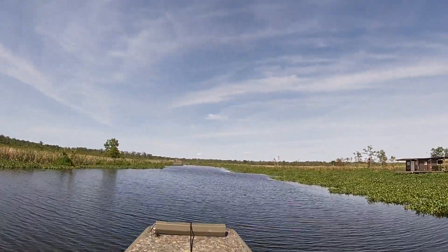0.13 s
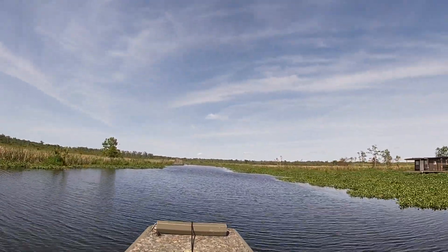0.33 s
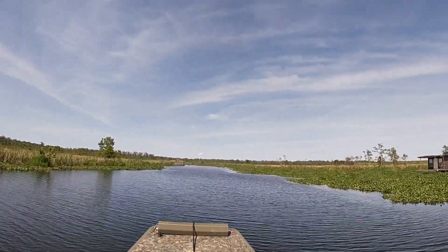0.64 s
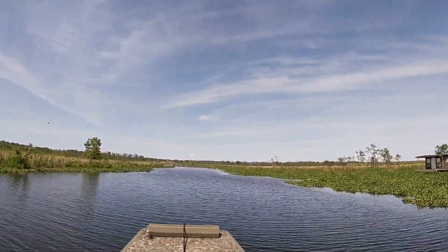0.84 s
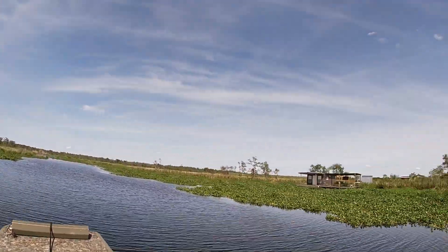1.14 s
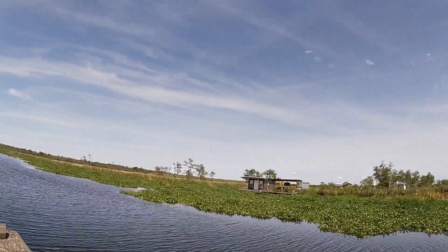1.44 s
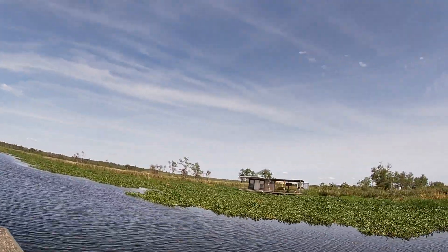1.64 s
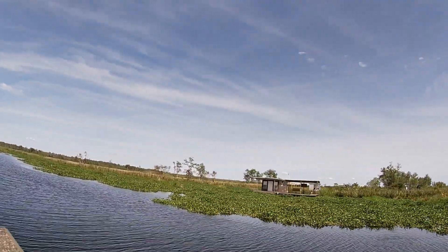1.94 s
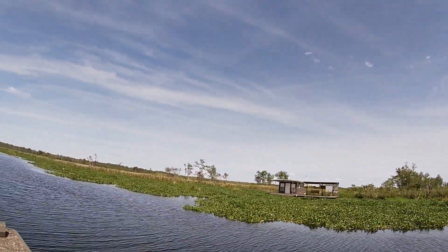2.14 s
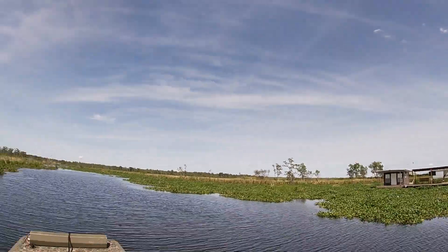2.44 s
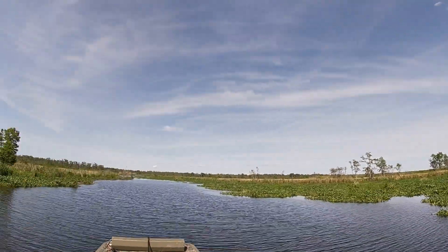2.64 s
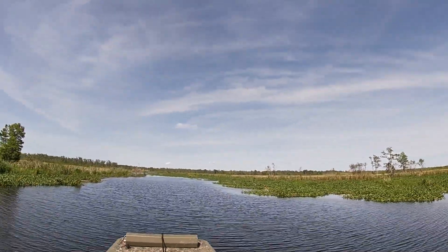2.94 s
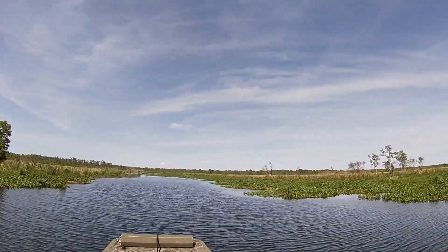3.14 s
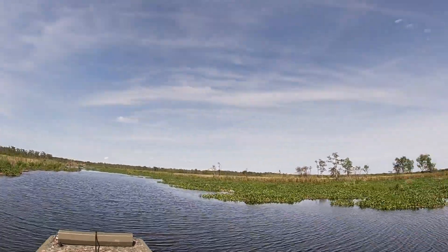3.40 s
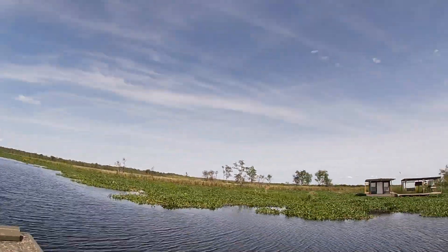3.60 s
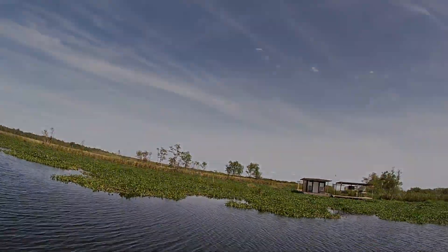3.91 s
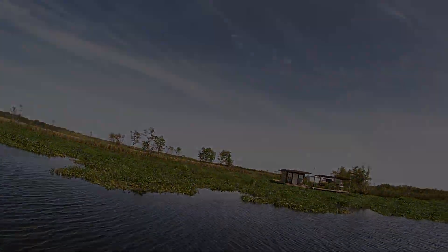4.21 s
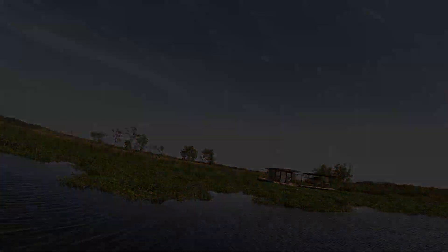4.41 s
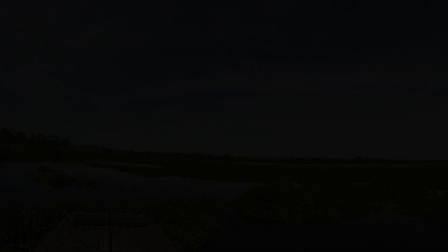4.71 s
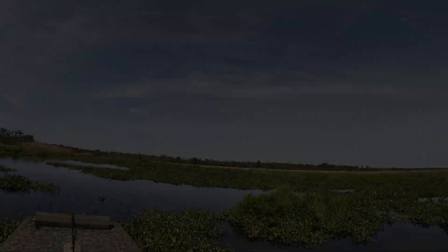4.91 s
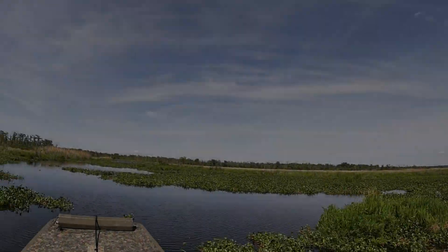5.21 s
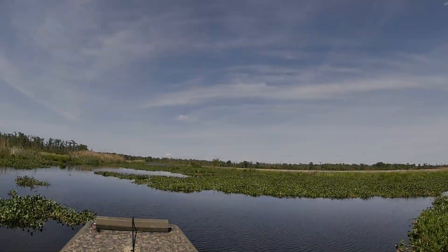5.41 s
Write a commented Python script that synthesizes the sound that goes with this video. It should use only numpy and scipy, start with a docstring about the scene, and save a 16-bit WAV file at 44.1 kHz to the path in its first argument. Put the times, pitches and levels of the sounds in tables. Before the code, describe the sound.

From the start, a loud, low engine drone fills the sound, a nearly pure, steady hum around 150 hertz with a growling exhaust rasp, hull rumble and a much quieter chopped hiss of propeller air. The microphone is on board the airboat in the open, with its level held even and no echo. A brief wind gust passes near 0.5 seconds and another at 1.3. From about 1.4 to 2.5 seconds the microphone faces aside: the rasp softens and airy wind rises. A small gust and swish come at 2.6, as the rasp partly returns, and another swish at 3.5. From 4 seconds the tone dulls again and wind hiss strengthens, gusting until about 4.67, when the sound breaks off and instantly swells back. The engine now turns faster, about two semitones higher, slightly uneven, with stronger beating boom and rumble, faint ticks and a last gust near 5.35.

```python
"""An airboat cruises over a swamp, heard on board through a microphone with fast gain control.
The eight-cylinder engine drones at its firing rate, with exhaust rasp, hull rumble, propeller rush and faint ticks.
Headwind blows in gusts. Twice, around 2 s and past 4 s, the microphone swings well aside: less rasp, more wind.
Near the end the sound breaks off and at once swells back with the engine turning faster.
The tones are cosines tied to the engine's turning or wandering freely; the airy sounds are shaped noise."""
import sys
import numpy as np
from scipy import signal
from scipy.fft import rfft, irfft
from scipy.io import wavfile
from scipy.ndimage import uniform_filter1d

SR = 44100
rng = np.random.default_rng(int(sys.argv[2]) if len(sys.argv) > 2 else 0)


def unload_audio(sound):
    """Save the sound as a 16-bit wav file, at the path given as the first command line argument."""
    columns = np.transpose(np.atleast_2d(sound))
    # keep every value between -1 and 1, then stretch to whole-number steps
    steps = np.round(np.clip(columns, -1, 1) * 32767)
    wavfile.write(sys.argv[1], SR, steps.astype(np.int16))


N = 244755

T = np.arange(N) / SR  # time in seconds
JUMP_S = 4.6754  # moment of the abrupt cut to the faster engine
FAST = T >= JUMP_S
FIRINGS_PER_CYCLE = 8  # each of the eight cylinders fires once a cycle
# How the microphone swings away from the bow and back.
# Each row: time in seconds, turn (0 facing ahead, 1 side-on).
MIC_TURN = [(0, 0.46), (.33, 0), (.75, 0.11), (1.27, .02), (1.42, 0.44), (2.15, 0.66), (2.85, 0.26),
            (3.6, .32), (4.0, 0.7), (4.67, 0.85), (4.68, 0), (4.85, 0.095), (5.05, 0.33), (5.54, 0.056)]


def gain_of(db):
    """Turns decibels into an amplitude factor."""
    return 10 ** (np.asarray(db) / 20)


def evened(x):
    """Scales a signal to an average strength (rms) of 1."""
    return x / np.sqrt(np.mean(abs(x) ** 2) + 1e-20)


def curve(rows):
    """Joins rows of (seconds, value) by straight lines."""
    return np.interp(T, *np.transpose(rows))


def swell(s, length):
    """A smooth rise and fall centred on time s."""
    return np.exp(-(2 * (T - s) / length) ** 2)


def colour(x, points):
    """Filters x along a curve of (Hz, dB), then scales it to rms 1."""
    point_hz, point_db = np.transpose(points)
    hz = np.fft.rfftfreq(N, 1 / SR)
    filter_db = np.interp(np.log(hz + 1), np.log(point_hz), point_db)
    return evened(irfft(rfft(x) * gain_of(filter_db), N))


def band(hz, width):
    """Noise gathered around one frequency, at rms 1; at 0 Hz it is a slow random drift."""
    offset = 2 * (np.fft.rfftfreq(N, 1 / SR) - hz) / width
    return evened(irfft(rfft(rng.standard_normal(N)) / (1 + offset ** 2 / 2), N))


def engine_speed():
    """Firings a second: a steady cruise with a slight drift, then a higher, uneven speed."""
    # Engine speed after the cut. Each row: time in seconds, firings a second in Hz.
    faster = [(4.68, 170), (4.76, 166.7), (4.96, 174.6), (5.05, 171.2), (5.39, 170), (5.54, 171.8)]
    cruise_hz, drift_hz, drift_width_hz = 151.6, .5, 5
    return np.where(FAST, curve(faster), cruise_hz + drift_hz * band(0, drift_width_hz))


def drone(cycles, orders, waver=.09, swing_db=1.5):
    """The firing tone is steady; tones from unequal cylinders waver in phase (turns) and strength."""
    out = np.zeros(N)
    for order, db in orders:
        order = round(order)
        loose = order != FIRINGS_PER_CYCLE  # only the firing tone itself holds steady
        turns = order * cycles + loose * (rng.random() + waver * band(0, 6))
        strength = gain_of(loose * swing_db * band(0, 3))
        out += gain_of(db) * evened(strength * np.cos(2 * np.pi * turns))
    return out


def engine(cycles):
    """The repeating cylinder firings sound as tones at multiples of the cycle rate, one set per speed."""
    # Engine tones before and after the cut. Each row: multiple of the cycle rate, level in dB.
    cruise_orders = [(8, -10), (9, -29.5), (10, -21), (12, -33.5), (17, -39.5)]
    fast_orders = [(8, -11), (11, -32), (15, -46), (19, -39)]
    return np.where(FAST, drone(cycles, fast_orders), drone(cycles, cruise_orders))


def rasp_level():
    """The exhaust rasp (dB) fades as the microphone turns aside and shades it."""
    cruise_db, fast_db, turn_db = -24, -25.5, -12  # facing ahead at each speed; change when side-on
    shade = np.maximum(curve(MIC_TURN), 0) ** 0.68  # under 1: the first part of a turn shades the most
    return np.where(FAST, fast_db, cruise_db) + turn_db * shade


def exhaust(cycles, throb=0.071, puff=0.077):
    """Gas puffs out at each firing, stronger once a cycle: a growling rasp and a steadier roar above it."""
    # Growling tones. Each row: multiple of the cycle rate, level in dB against the rasp level.
    growl_orders = [(13, -12), (14, -16.5), (16, -7), (20, -20), (21, -17.5), (22, -12.5), (24, -21),
                    (29, -21), (31, -24)]
    # Tone colour of the rasp and the roar. Each row: frequency in Hz, relative level in dB.
    rasp_colour = [(120, -26.5), (230, -5), (300, 5), (420, -3.5), (490, -3.5), (560, -3.5), (680, -14.5),
                   (850, -17), (1500, -33), (4000, -65.5)]
    roar_colour = [(300, -13), (550, 3), (700, 2), (850, 0), (1050, -0.5), (1250, -10), (1700, -15.5),
                   (3000, -22), (8000, -61)]
    once_a_cycle = 1 + throb * np.cos(2 * np.pi * cycles)
    each_firing = 1 + puff * np.cos(2 * np.pi * FIRINGS_PER_CYCLE * cycles)
    gate = once_a_cycle * each_firing
    growl = drone(cycles, growl_orders)
    rasp_noise = gain_of(-2.5) * colour(gate * rng.standard_normal(N), rasp_colour)
    rasp = gain_of(rasp_level()) * (growl + rasp_noise)
    roar_gain = gain_of(-39.5 + 1.4 * band(10.0, 6))  # flutters about ten times a second
    roar = roar_gain * colour(gate * rng.standard_normal(N), roar_colour)
    return rasp + roar


def wandering(hz, wander_hz, swing_db=2.5):
    """A tone whose pitch and strength stray at random."""
    turns = np.cumsum(hz + wander_hz * band(0, 16)) / SR
    return evened(gain_of(swing_db * band(0, 12.0)) * np.cos(2 * np.pi * turns))


def hull():
    """Propeller and hull boom in wandering tones that beat against the drone, over a wide rumble."""
    # Booming tones before and after the cut.
    # Each row: frequency in Hz, pitch wander in Hz, level in dB.
    cruise_boom = [(82.5, 9, -33.5), (129.8, 2.6, -35.5), (230.2, 5, -32.5)]
    fast_boom = [(70.8, 6.6, -30), (138.3, 5.6, -16), (205.6, 6.6, -29)]
    # Tone colour of the rumble. Each row: frequency in Hz, relative level in dB.
    rumble_colour = [(10, -21.5), (30, -8), (55, -12), (75, 0), (110, 1), (150, 5.5), (195, 0), (230, -1),
                     (270, -11.5), (400, -20), (900, -68.5)]
    cruise = sum(gain_of(db) * wandering(hz, wander) for hz, wander, db in cruise_boom)
    fast = sum(gain_of(db) * wandering(hz, wander) for hz, wander, db in fast_boom)
    rumble = colour(rng.standard_normal(N), rumble_colour)
    return np.where(FAST, fast + gain_of(-20.5) * rumble, cruise + gain_of(-25.0) * rumble)


def propeller(cycles, flutter_db=1.96, chop=0.17):
    """Air rushes through the blades, chopped at the shaft and blade rates."""
    # Tone colour of the rush. Each row: frequency in Hz, relative level in dB.
    rush_colour = [(400, -10), (1000, 4.5), (1400, -1), (1850, -5), (2400, -1.5), (2850, -0.5),
                   (3400, -2.5), (4300, -11), (5600, -11), (7000, -23.5), (8700, -31), (9900, -23.5),
                   (10800, -50.5), (16000, -75.5)]
    shaft_chop = chop * np.cos(2 * np.pi * 2 * cycles)  # two shaft turns a cycle
    blade_chop = chop * np.cos(2 * np.pi * 6 * cycles)  # six blade passes a cycle
    rush = colour((1 + shaft_chop + blade_chop) * rng.standard_normal(N), rush_colour)
    return gain_of(-49.5 + flutter_db * band(12, 8)) * rush


def wind_level():
    """The wind (dB, before flutter) grows as the microphone turns aside, and with each gust."""
    # Gusts of headwind. Each row: middle in seconds, length in seconds, rise in dB.
    gust_rows = [(.46, .06, 8.5), (1.327, 0.078, 4.5), (2.636, 0.071, 4.5), (4.384, .13, 5),
                 (4.618, 0.23, 4.5), (5.35, 0.2, 7)]
    cruise_db, fast_db, turn_db = -52.5, -58.5, 12  # facing ahead at each speed; change when side-on
    gusts = sum(db * swell(s, length) for s, length, db in gust_rows)
    return np.where(FAST, fast_db, cruise_db) + turn_db * curve(MIC_TURN) + gusts


def wind(flutter_db=0.74, grit_db=1.5):
    """Headwind hisses past the microphone in fluttering gusts; the strongest add a brighter sizzle."""
    # Tone colour of the hiss and the sizzle. Each row: frequency in Hz, relative level in dB.
    hiss_colour = [(500, -17), (1050, 1.5), (1500, 2.5), (2000, 0), (2400, 0), (2900, 1), (3400, -2.5),
                   (4400, -13), (5500, -21.5), (7000, -29), (9000, -40), (16000, -68.5)]
    sizzle_colour = [(1500, -26), (3000, -1.5), (4000, 2), (4700, 1.5), (5500, -10), (7000, -19.5),
                     (10000, -45), (16000, -70.5)]
    gust = gain_of(wind_level() + flutter_db * band(8.8, 4.4) + grit_db * band(0, 65))
    hiss = gain_of(1.5) * gust * colour(rng.standard_normal(N), hiss_colour)
    # squared, so the sizzle grows faster than the hiss
    sizzle = gain_of(28) * gust ** 2 * colour(rng.standard_normal(N), sizzle_colour)
    return hiss + sizzle


def swishes():
    """Brief swishes, each noise around one frequency, stand out of the rushing air."""
    # Each row: middle in seconds, length in seconds, frequency in Hz, width in Hz, level in dB.
    swish_rows = [(1.65, 0.055, 1440, 150, -50), (2.605, 0.092, 1440, 200, -45.5),
                  (3.456, 0.055, 1850, 500, -44.5)]
    return sum(gain_of(db) * swell(s, length) * band(hz, width) for s, length, hz, width, db in swish_rows)


def crackle(per_s=90, spread_db=0.5):
    """Faint high ticks at random moments, stronger at the higher speed."""
    # Tone colour of the ticks. Each row: frequency in Hz, relative level in dB.
    tick_colour = [(1500, -18.5), (4000, -3.5), (8000, -0.5), (10000, 1.5), (11000, -26.5), (16000, -36)]
    size = gain_of(spread_db * np.minimum(rng.exponential(1, N), 4)) * rng.choice([-1, 1], N)
    ticks = colour(size * (rng.random(N) < per_s / SR), tick_colour)
    return np.where(FAST, gain_of(-71), gain_of(-76.0)) * ticks


def scene():
    """Adds all sources; engine, exhaust and propeller follow one count of engine cycles."""
    cycles = np.cumsum(engine_speed()) / SR / FIRINGS_PER_CYCLE
    cycles = cycles - np.interp(JUMP_S, T, cycles)  # count from the cut
    air = propeller(cycles) + wind() + swishes() + crackle()
    return (engine(cycles) + hull() + exhaust(cycles) + air)[None]


def record(dry, threshold_db=-8.5, squeeze=1.0, hold_s=0.013, fade_s=0.0028):
    """Fast gain control evens out slow beats; the sound swells in at the start and the cut; the top is cut off."""
    hold = max(int(hold_s * SR), 2)
    power = uniform_filter1d(uniform_filter1d(dry[0] ** 2, hold), hold)
    over_db = np.maximum(10 * np.log10(abs(power) + 1e-12) - threshold_db, 0)
    levelled = dry * gain_of(-min(squeeze, 1) * over_db)
    fade_in = np.clip(np.where(FAST, T - JUMP_S, T) / fade_s, 0, 1)
    # the sound starts to drop just before it breaks off
    sag = np.where(FAST, 1, np.interp(JUMP_S - T, [0, .0006], [.6, 1]))
    low_pass = signal.firwin(511, 15800, window=("kaiser", 9), fs=SR)  # edge in Hz
    return signal.oaconvolve(levelled * fade_in * sag, low_pass[None], "same")


dry = scene()
out = record(dry)
unload_audio(out)
```